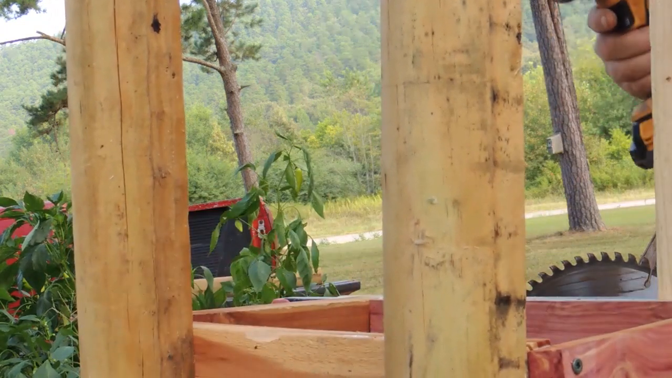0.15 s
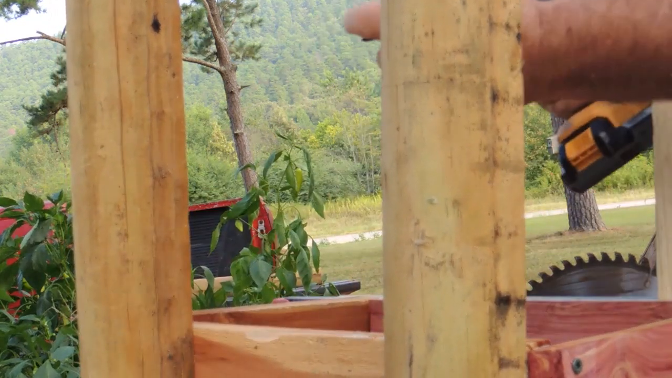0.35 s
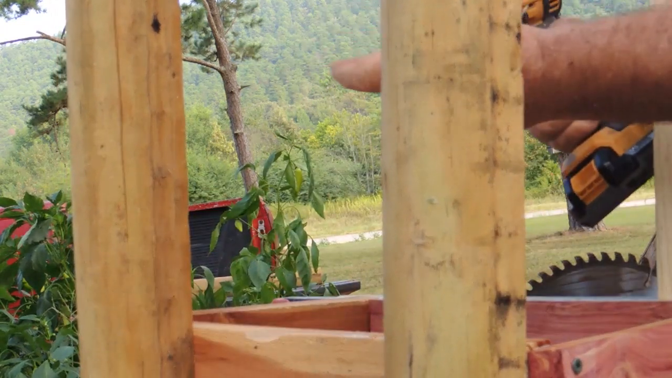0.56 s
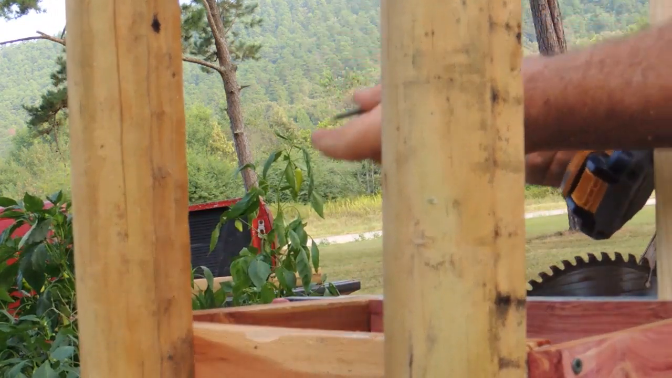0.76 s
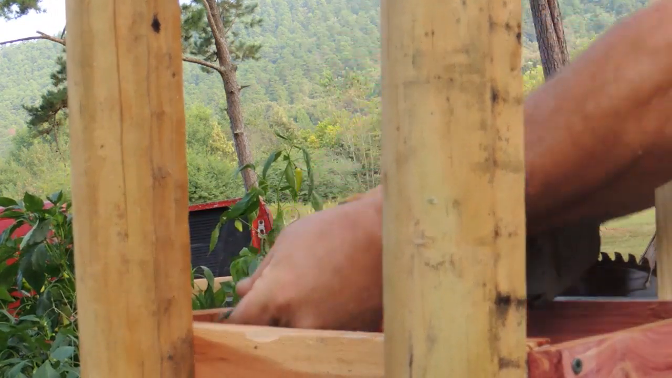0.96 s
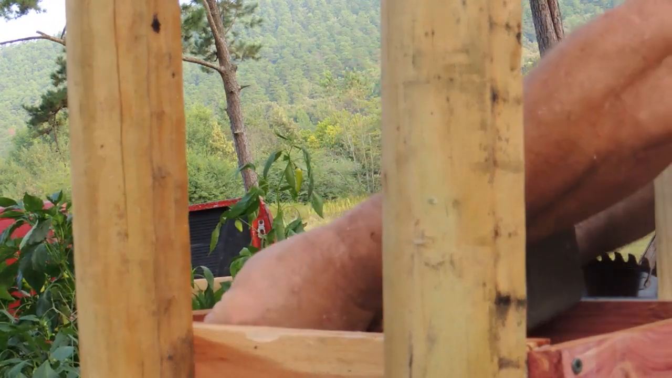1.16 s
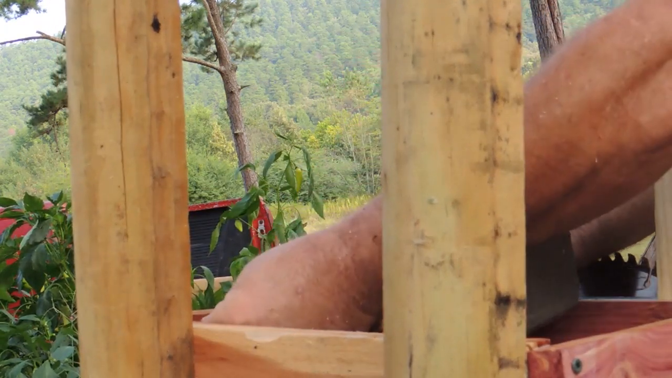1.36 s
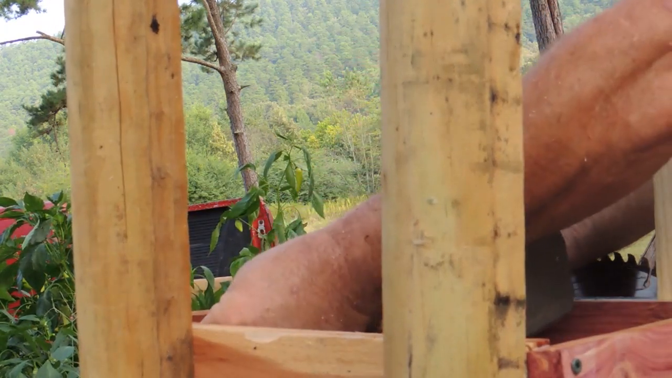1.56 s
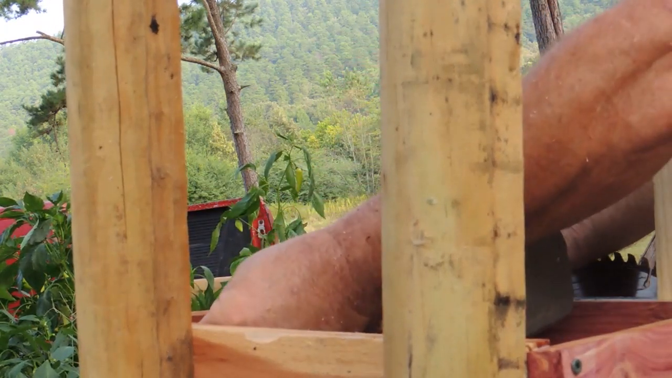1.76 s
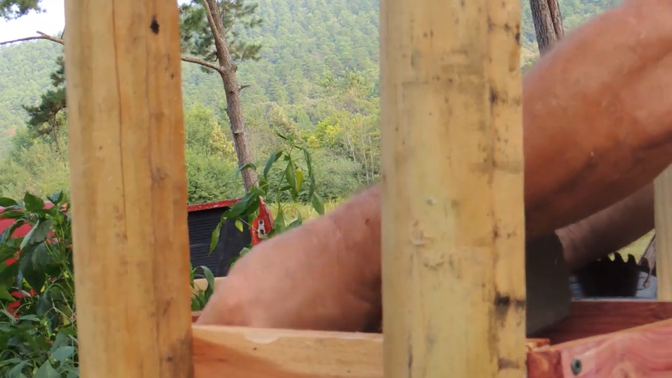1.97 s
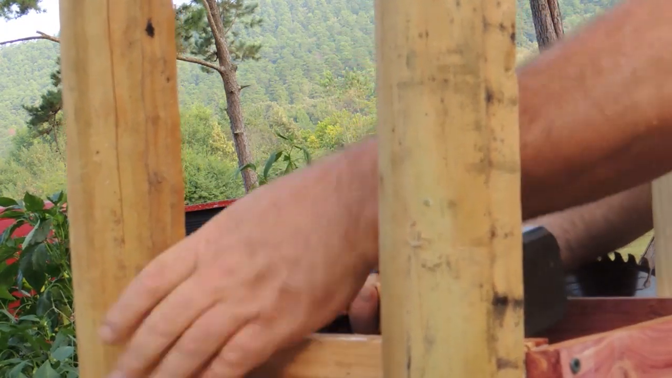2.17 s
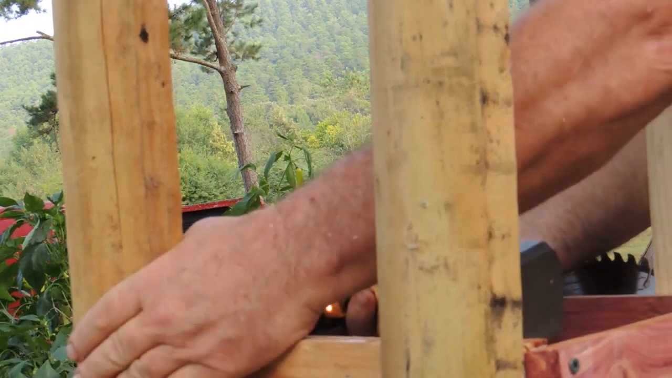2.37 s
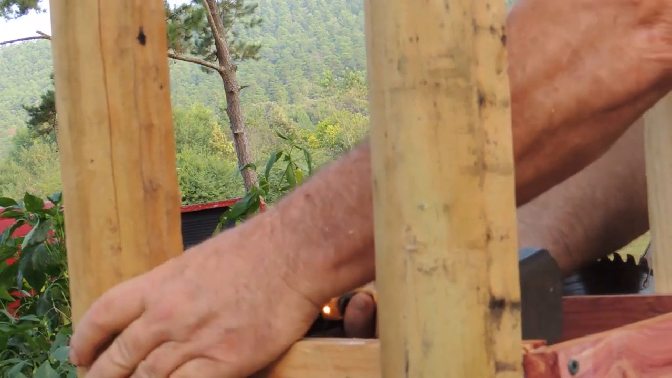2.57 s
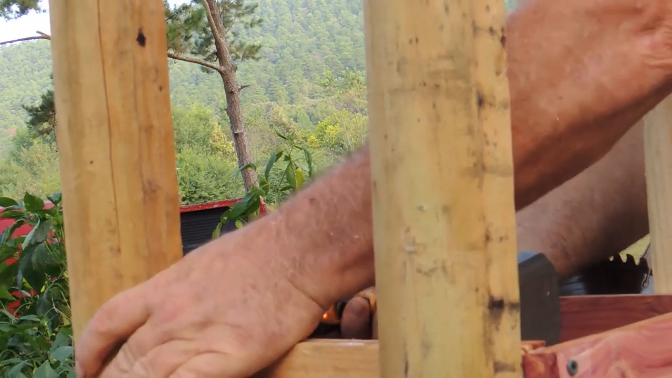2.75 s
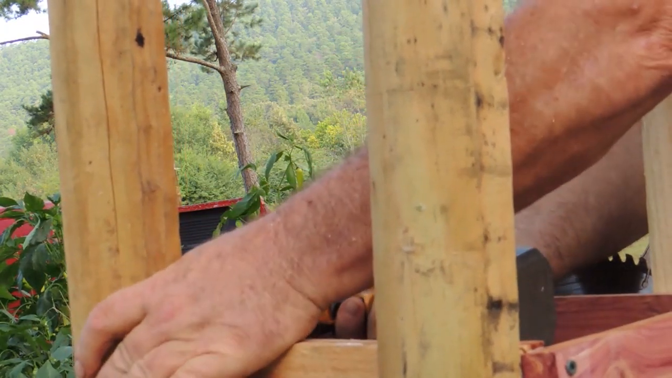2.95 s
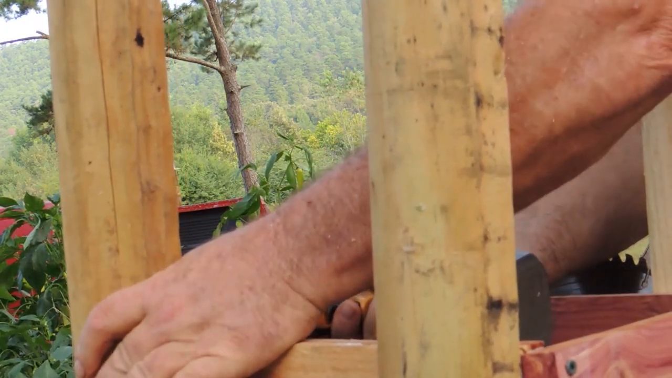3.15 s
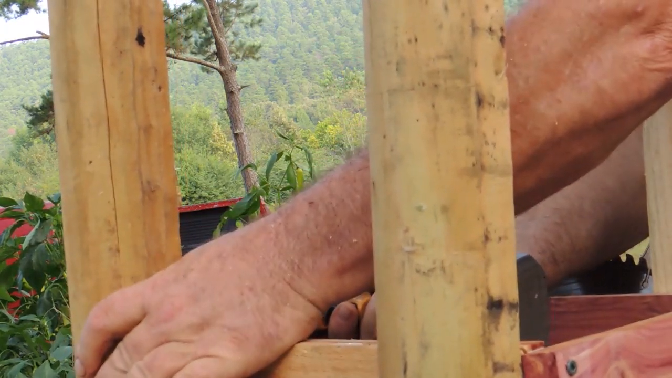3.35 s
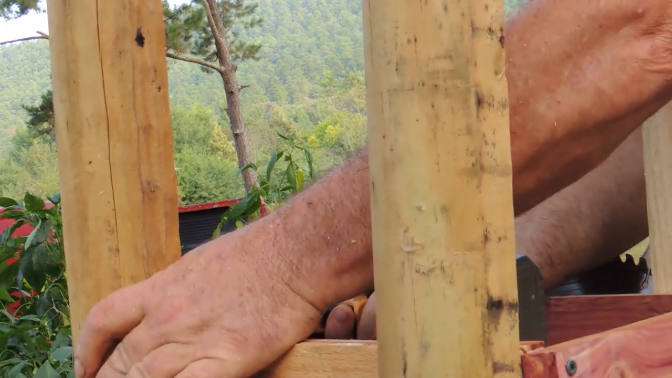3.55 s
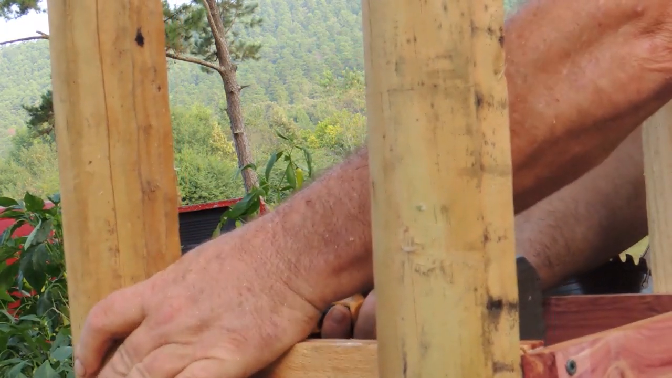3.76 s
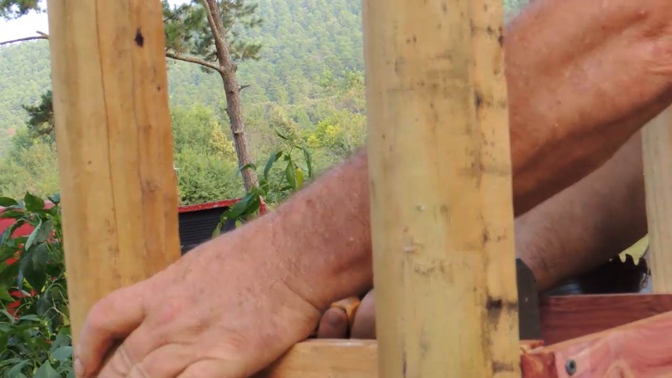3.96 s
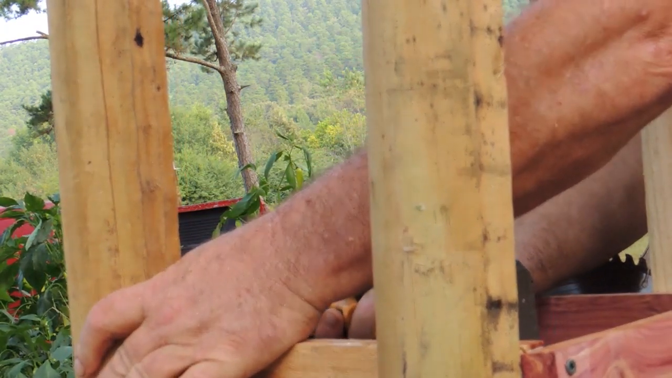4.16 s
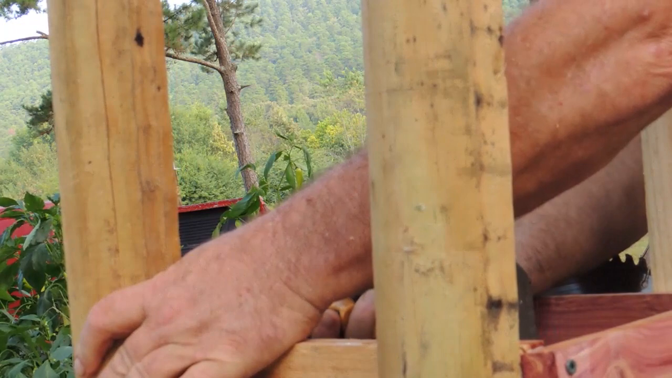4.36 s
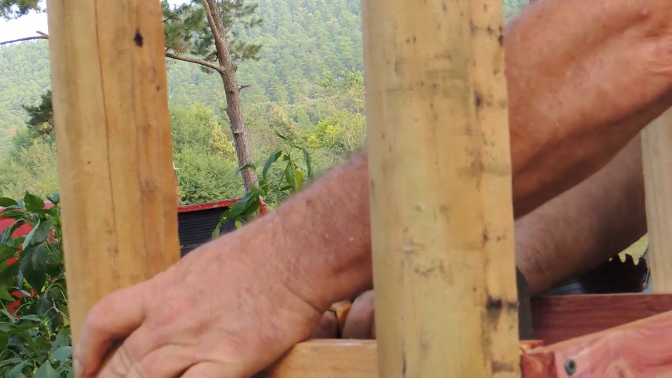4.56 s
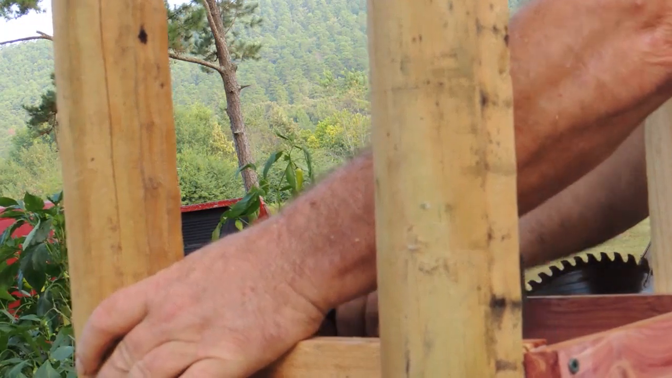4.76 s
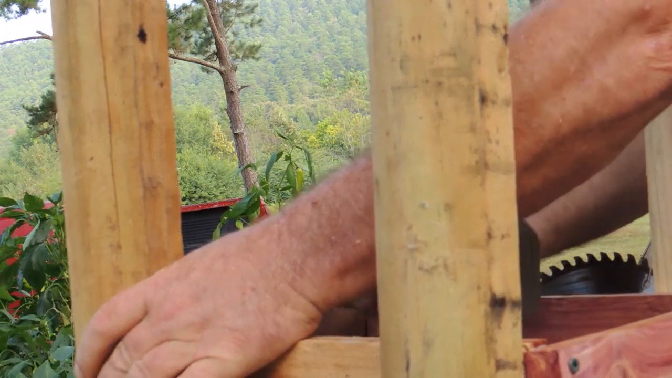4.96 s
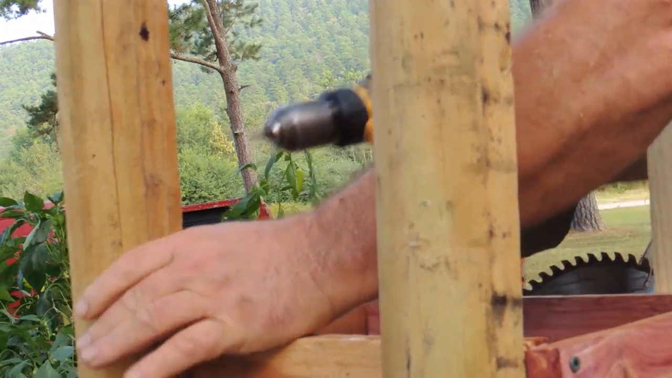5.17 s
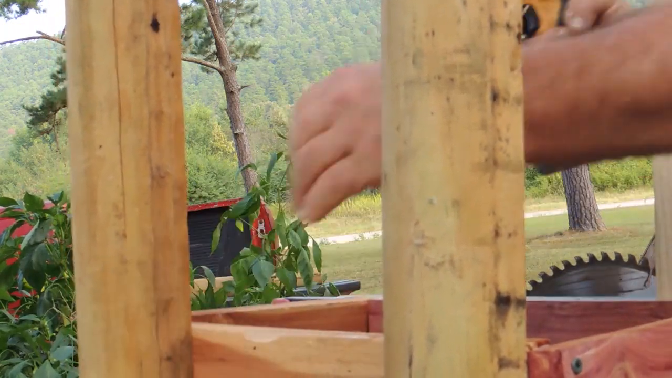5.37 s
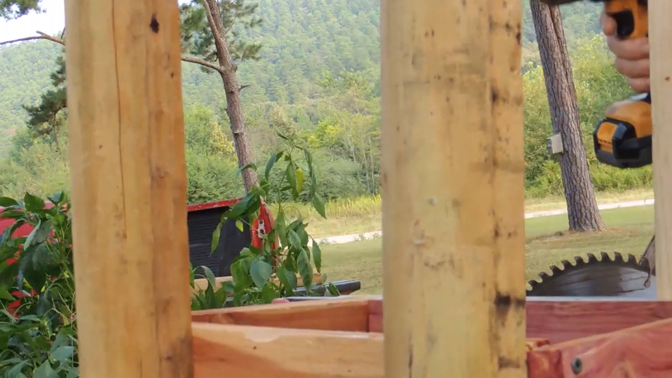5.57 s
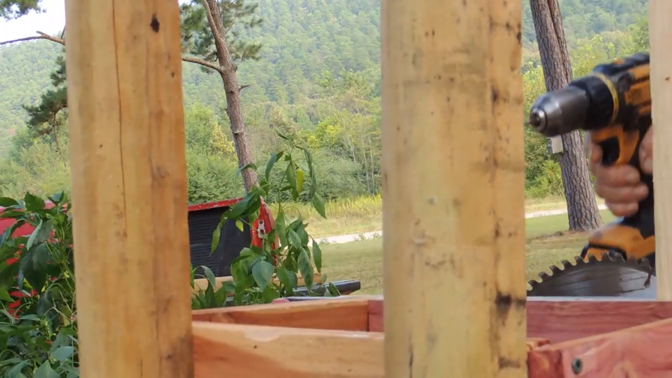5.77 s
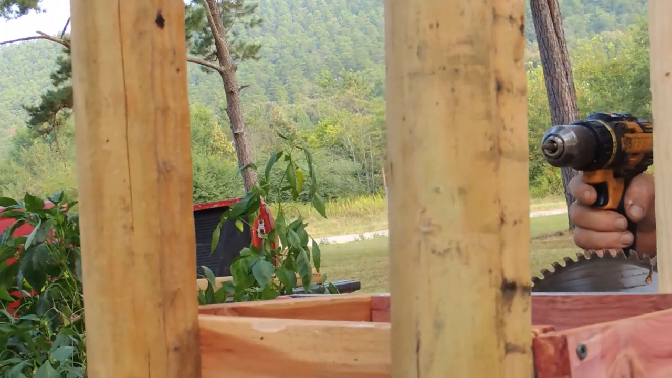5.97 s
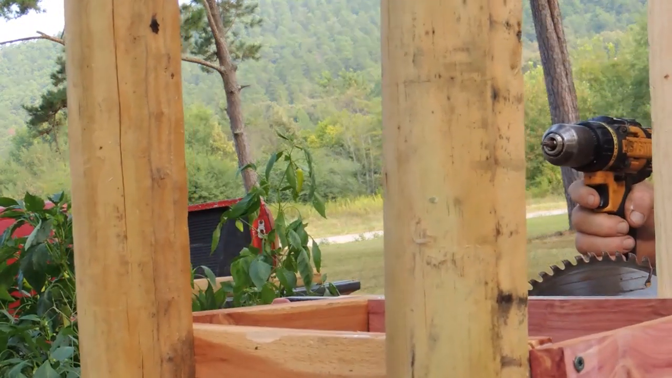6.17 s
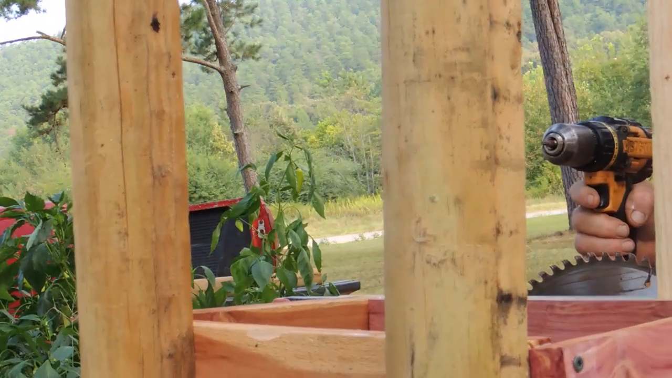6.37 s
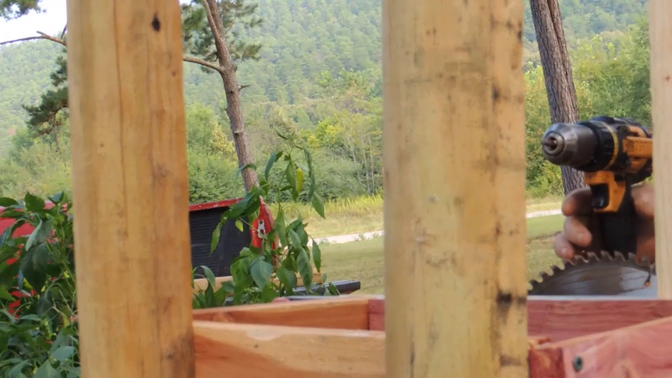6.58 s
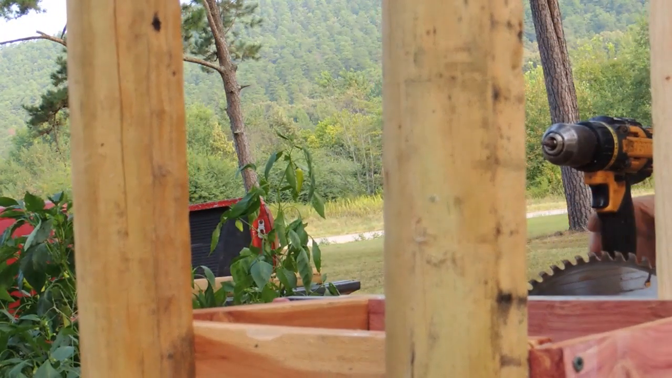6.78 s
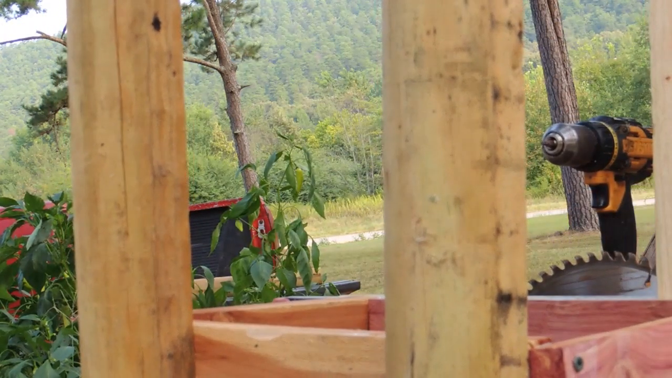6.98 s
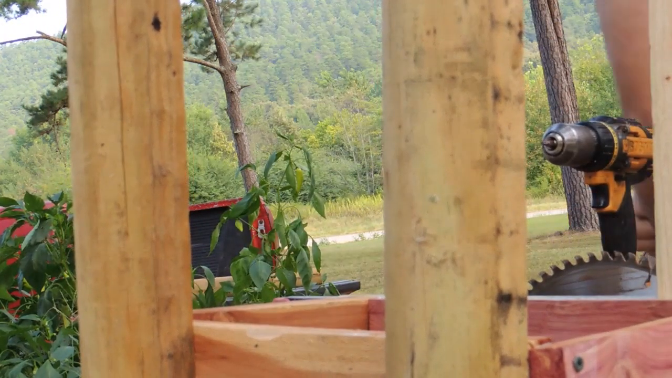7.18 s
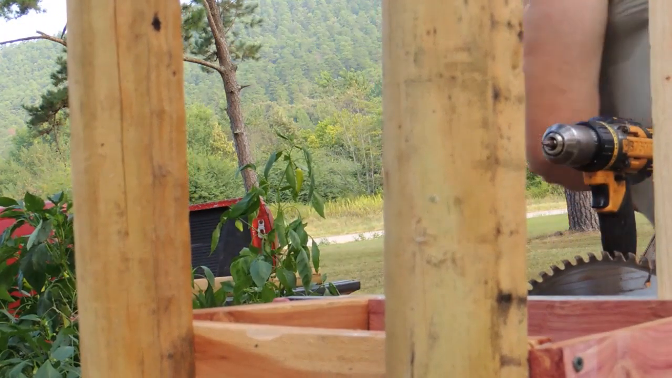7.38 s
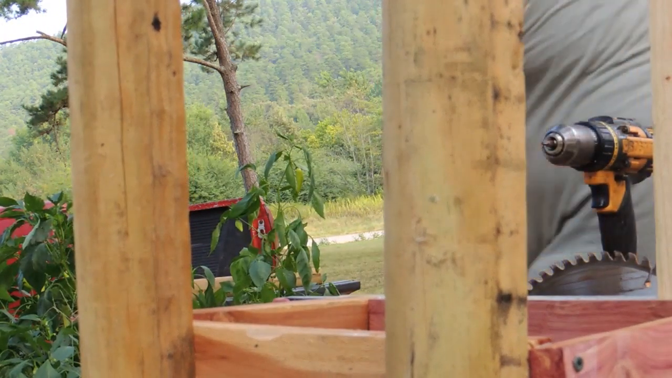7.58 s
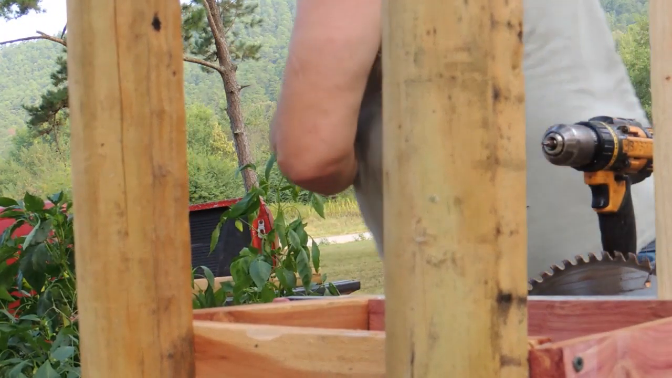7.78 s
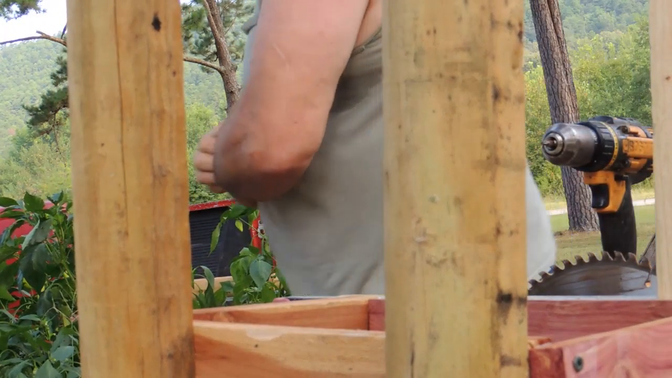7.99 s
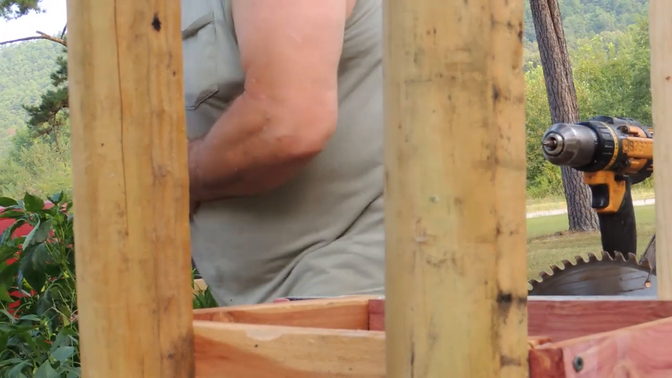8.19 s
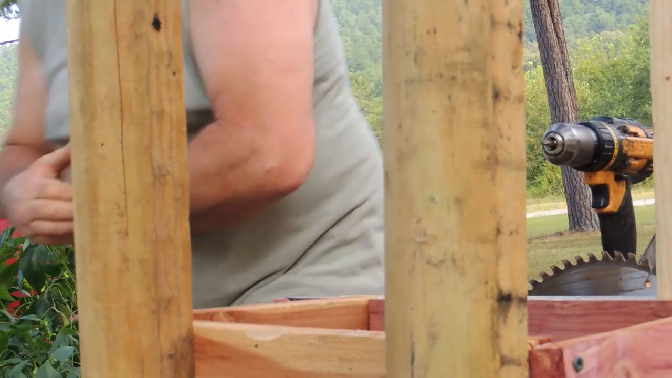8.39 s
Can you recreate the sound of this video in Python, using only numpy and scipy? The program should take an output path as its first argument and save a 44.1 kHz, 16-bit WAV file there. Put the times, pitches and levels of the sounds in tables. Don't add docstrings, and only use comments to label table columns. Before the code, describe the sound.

An open-air porch with constant thin hiss, high shimmering cicadas in the trees and low wind rumble on two widely spaced microphones about a metre from the work. For the first 1.6 seconds only small ticks are heard. At 1.67 a soft contact and a faint electric whistle, then the cordless drill spins up at 1.8, its housing droning briefly. It whines with gear rattle, fan hiss and humming boards; small wood knocks come at 2.8, 2.9 and 3.2-3.3. From 3.8 it strains harder, its pitch sagging until it halts near 4.7. At 4.9 a loud double knock as the tool comes free, smaller bumps at 5.4-5.6, a hard clack and thuds at 5.9-6.1 as it is set down, and another knock at 6.4. Wind gusts bump around 6.4 and 7.7; a near cicada on the right buzzes from 7.5 to 8.2, then faint ticks.

```python
import sys
import numpy as np
from scipy import signal
from scipy.fft import rfft, irfft
from scipy.io import wavfile
from scipy.ndimage import uniform_filter1d, minimum_filter1d

SR = 44100
rng = np.random.default_rng(int(sys.argv[2]) if len(sys.argv) > 2 else 0)


def store_pcm(level_fs):
    pcm = np.round(np.clip(level_fs, -1, 1) * 32767).astype(np.int16)
    wavfile.write(sys.argv[1], SR, np.atleast_2d(pcm).T)


def convert_level_to_amplitude(level_db):
    exponent = np.asarray(level_db, float) / 20
    return 10 ** exponent


N = 371763
TIME = np.arange(N) / SR


def follow(table):
    return np.interp(TIME, *np.transpose(table))


def bump(s, length):
    return np.exp(-((TIME - s) / length) ** 2)


def colour(x, spectrum):
    hz, db = np.transpose(spectrum)
    f = np.arange(x.shape[-1] // 2 + 1) * SR / x.shape[-1] + 1
    gain = convert_level_to_amplitude(np.interp(np.log(f), np.log(hz), db, left=-90, right=-90))
    y = irfft(rfft(x) * gain, x.shape[-1])
    return y / np.sqrt(np.mean(y ** 2))


def walk(rate):
    k = int(SR / rate)
    steps = np.repeat(rng.standard_normal((2, N // k + 1)), k, axis=1)
    return 1.3 * uniform_filter1d(uniform_filter1d(steps, k), k)[:, :N]


def pan(db):
    g = convert_level_to_amplitude(np.array([[db / 2], [-db / 2]]))
    return 2 * g / np.sqrt(np.sum(g ** 2))


def hiss(count=N):
    return rng.standard_normal((2, count))


def grains(scatter_db, count=N):
    size_db = scatter_db * np.minimum(rng.exponential(size=(2, count)), 4)
    return hiss(count) * convert_level_to_amplitude(size_db)


def add(out, s, x):
    i = int(s * SR)
    out[:, i:i + x.shape[1]] += x[:, :N - i]


# [f/Hz, level/dB per Hz]
AIR_SPECTRUM = [(71, -28), (120, 0), (156, -0.5), (183, -4.5), (269, -5), (323, -6), (412, -5.5),
                (1020, -10.5), (3500, -13.5), (4940, -14), (6290, -13.5), (7400, -5), (8870, -10.5),
                (13800, -15.5), (15000, -31)]


def air():
    return convert_level_to_amplitude(-53.5 + .5 * walk(2.0)) * pan(-1.1) * colour(hiss(), AIR_SPECTRUM)


# [f/Hz, width/Hz, level/dB, left minus right/dB]
FAR_CICADAS = [
    (4930, 570, -64.5, -4),
    (7380, 840, -53, -8),
]


def far_cicadas():
    out = 0
    for hz, width, db, pan_db in FAR_CICADAS:
        band = [(hz - 1.32 * width, -30), (hz - width / 2, -4), (hz, 0), (hz + width / 2, -4),
                (hz + 1.3 * width, -30)]
        shimmer_db = 0.29 * walk(1.0) + 0.87 * walk(30)
        out = out + convert_level_to_amplitude(db + shimmer_db) * pan(pan_db) * colour(grains(1.7), band)
    return out


# [f/Hz, level/dB per Hz]
CICADA_SONG = [(5000, -37), (8500, -9), (9270, 1), (10100, -3), (11200, -5), (11600, -11), (13000, -12),
               (14400, -12)]


def near_cicada():
    on_s, attack_s, off_s, release_s = 7.47, .25, 8.17, .06
    pulse_hz = 115
    pulses = 1 + 0.18 * np.cos(2 * np.pi * pulse_hz * TIME + walk(12)[0])
    sings = np.clip(np.minimum((TIME - on_s) / attack_s, 1 + (off_s - TIME) / release_s), 0, 1)
    return convert_level_to_amplitude(-53.5 + 1.5 * walk(10)[0]) * sings * pan(-11) * pulses * colour(grains(1.5), CICADA_SONG)


# [f/Hz, level/dB per Hz]
WIND_SPECTRUM = [(12, 0), (35, -2), (60, -4), (110, -12), (200, -26.5), (400, -30)]
# [t/s, peak level/dB, length/s]
WIND_GUSTS = [(.19, -55, 0.078), (.45, -52.5, 0.1), (1.08, -52, 0.06), (1.7, -53, 0.078), (2.52, -55, 0.13),
              (2.9, -56, 0.089), (3.3, -57, 0.044), (3.48, -49, 0.23), (4.5, -52.5, 0.13),
              (5.63, -51.5, 0.11), (6.13, -54, 0.033), (6.29, -50, 0.033), (6.42, -46, 0.078),
              (6.97, -70, 0.13), (7.18, -53, 0.46), (7.66, -43.5, 0.062), (7.76, -51, 0.087),
              (7.89, -49, 0.019), (8.02, -52.5, 0.24), (8.36, -56, 0.037)]


def wind():
    breeze = convert_level_to_amplitude(-60)
    blows = breeze + sum((convert_level_to_amplitude(db) - breeze) * bump(s, length) for s, db, length in WIND_GUSTS)
    return blows * convert_level_to_amplitude(walk(15)) * pan(-5.5) * colour(hiss(), WIND_SPECTRUM)


# [t/s, peak level/dB, f/Hz, length/s]
SMALL_TICKS = [(0.039, -45.5, 5000, 0.0065), (0.543, -49, 10000, .01), (0.882, -59, 1120, 0.03),
               (1.6013, -49, 4760, 0.015), (5.218, -51, 4700, 0.014), (5.28, -51, 4770, 0.011),
               (5.472, -51, 2850, 0.011), (5.81, -59, 1730, 0.023), (6.079, -44.5, 3910, 0.0065),
               (6.113, -56, 1140, 0.012), (6.906, -53, 4640, 0.013), (6.974, -50.5, 3220, 0.013),
               (7.086, -54, 2700, 0.011), (7.65, -59, 3520, 0.02), (8.008, -57, 4860, 0.015),
               (8.306, -54.5, 3380, 0.015), (8.417, -52, 1630, 0.02), (8.404, -58, 2580, .03),
               (8.248, -55, 4800, .015), (8.415, -57, 3300, .02)]


def ticks():
    out, t = np.zeros((2, N)), TIME[:SR // 10]
    for s, db, hz, length in SMALL_TICKS:
        puff = colour(hiss(len(t)), [(hz / 1.6, -25), (hz, 0), (hz * 1.25, -25)])
        envelope = np.exp(-t / max(length, .002)) * (1 - np.exp(-t / 0.0021))
        add(out, s, convert_level_to_amplitude(db + 0.5) * pan(-6.5) * puff * envelope)
    return out


# [t/s, peak level/dB, length/s]
SLEEVE_BRUSHES = [(1.675, -49, 0.0053), (5.39, -54, .012), (6.66, -53, 0.026), (5.83, -56, 0.045),
                  (6.083, -54, .015), (6.137, -51.5, 0.018), (7.662, -54, 0.013)]
# [f/Hz, level/dB per Hz]
CLOTH_SPECTRUM = [(800, -5), (2000, -2), (5000, -5), (10000, -5.5), (14000, -6)]


def brushes():
    strokes = sum(convert_level_to_amplitude(db) * bump(s, length) for s, db, length in SLEEVE_BRUSHES)
    return strokes * pan(-4.5) * colour(grains(2.5), CLOTH_SPECTRUM)


# [t/s, peak level/dB, f/Hz, t60/s]
RINGING_TAPS = [(2.778, -22, 290, .04), (2.778, -30, 1150, .03), (2.79, -30, 350, .04),
                (2.907, -26, 350, .04), (2.907, -31, 1150, .03), (3.199, -30, 330, .04),
                (3.282, -25, 280, .04), (4.9043, -12, 322, .04), (4.9042, -20, 660, .03),
                (4.904, -21, 1250, .02), (4.9045, -27, 2150, .025), (4.911, -30, 985, .04),
                (4.9055, -22, 470, .04), (4.908, -37, 1590, .06), (4.923, -32, 668, .05),
                (4.961, -44, 760, .05), (5.94, -32, 950, .04), (5.941, -47, 1220, .12),
                (6.01, -49, 1220, .15), (6.0008, -26, 470, .03), (6.4345, -23, 400, .018),
                (6.441, -36, 920, .05), (7.6805, -32, 760, .028), (7.682, -40, 1870, .04)]


def taps():
    out, t = np.zeros((2, N)), TIME[:SR // 10]
    for s, db, hz, t60 in RINGING_TAPS:
        ring = np.sin(2 * np.pi * hz * t + [[np.pi - .5], [np.pi + .5]])
        onset = 1 - np.exp(-(t / .0012) ** 2)
        add(out, s, convert_level_to_amplitude(db - 60 * t / t60) * pan(-3.5) * ring * onset)
    return out


# [t/s, peak level/dB, ring f/Hz, crack above it/dB, upper ring f/Hz]
WOOD_KNOCKS = [(1.673, -34.5, 760, -11, 1490), (2.779, -28, 308, -9, 1145), (2.791, -28, 328, -17, 3600),
               (2.908, -23.5, 340, -11, 1150), (3.197, -35, 404, -10, 1610), (3.286, -28, 394, -18, 2380),
               (4.911, -20, 257, -7.5, 1000), (4.925, -20.5, 335, -34, 1070),
               (4.936, -28.5, 320, -28, 1030), (4.945, -34, 328, -25, 900),
               (5.3829, -29.5, 278, -14.5, 1360), (5.402, -39, 327, -10, 990), (5.573, -39, 242, -26, 1230),
               (5.956, -34.5, 232, -3, 1210), (5.997, -32.5, 597, -3, 1370), (6, -23.5, 450, -20, 1260),
               (6.019, -35, 392, -7, 1230), (6.06, -40.5, 250, -10, 1040), (6.14, -41.5, 450, -15, 1100),
               (6.439, -29, 274, -1, 3095), (6.442, -33.5, 262, -1, 1960), (6.447, -33.5, 253, 0, 1590),
               (6.453, -39, 248, -2, 3080), (6.631, -42, 1110, -16, 2600), (6.636, -38, 774, 0, 2440),
               (6.739, -45.5, 242, -10, 3660), (7.578, -45, 685, -8, 988)]
CHUCK_STRIKES = [
    (4.9036, -19, 330, -2, 3610),
    (5.9387, -21.5, 444, -10, 3460),
]
# [t/s, peak level/dB, ring f/Hz]
SOFT_THUMPS = [(1.676, -44, 323), (5.715, -46.5, 229), (5.8, -44.5, 225), (6.33, -44, 422),
               (6.595, -46.5, 230), (6.636, -40, 383), (8.05, -49, 900)]
# [f as a multiple of the ring, level/dB per Hz]
FRAME_MODES = [(.3, -38), (.6, -1.5), (1.0, 1), (1.5, -3), (2.2, -6), (3.6, -13.5), (6.5, -32), (10.5, -38)]
# [f/Hz, level/dB per Hz]
CRACK_SPECTRUM = [(1000, 4), (1800, 3), (3000, 1.5), (3800, -2.5), (5000, -12.5), (8000, -10), (14000, -27)]
# [f/Hz, level/dB, t60/s]
POST_MODES = [(670, 0, 0.037), (800, -8, 0.033), (948, -9, 0.032), (1210, -8, 0.027)]


def knocks():
    out, t = np.zeros((2, N)), TIME[:SR // 4]
    later = np.array([[np.pi - .5], [np.pi + .5]])
    push = 1 - np.exp(-(t / 0.002) ** 2)
    snap = 1 - np.exp(-t / 0.00093)
    blows = [(0, k) for k in WOOD_KNOCKS] + [(1, k) for k in CHUCK_STRIKES]
    blows += [(0, (s, db, hz, -18, 4 * hz)) for s, db, hz in SOFT_THUMPS]
    for steel, (s, db, hz, crack_db, upper_hz) in blows:
        t60 = 0.061 * (330 / hz) ** 0.56
        posts = sum(convert_level_to_amplitude(g - 60 * t / d) * np.sin(2 * np.pi * f * t + later) for f, g, d in POST_MODES)
        ring = convert_level_to_amplitude(-1 - 65 * t / t60) * np.sin(2 * np.pi * hz * t + later)
        modes = colour(hiss(len(t)), np.multiply(FRAME_MODES, (hz, 1)))
        frame = (convert_level_to_amplitude(-8.5 - 55 * t / t60) + convert_level_to_amplitude(-28 - 60 * t / .16)) * modes
        upper = convert_level_to_amplitude(-6 * steel - 60 * t / .03) * np.sin(2 * np.pi * upper_hz * t + later)
        sharp = min((upper_hz / 2200) ** 0.21, 1.15)
        crack = colour(grains(3.0, len(t)), np.multiply(CRACK_SPECTRUM, (sharp, 1)))
        crack = (convert_level_to_amplitude(-1 - 60 * t / 0.03) + convert_level_to_amplitude(-30 - 60 * t / 0.25)) * crack
        softness_db = 0.16 * min(db + 19.5, 0)
        low = (ring + frame + steel * posts) * push
        high = (upper + convert_level_to_amplitude(softness_db) * crack) * snap
        add(out, s - .001, convert_level_to_amplitude(db) * pan(-5.5) * (low + convert_level_to_amplitude(crack_db) * high))
    return out


# [t/s, peak level/dB, f/Hz, length/s]
RESONANT_GROANS = [(1.861, -46.5, 2120, 0.045), (1.921, -47, 1280, 0.085), (2.047, -46, 690, 0.025),
                   (2.127, -41.5, 2250, 0.062), (2.195, -40.5, 721, 0.025), (2.97, -44, 836, .03),
                   (3.66, -45, 1170, 0.022), (3.75, -47, 437, .03), (3.87, -48, 556, 0.018),
                   (3.98, -46.5, 446, 0.19), (4.171, -46, 736, .025), (4.4, -43, 620, 0.076),
                   (4.4, -49, 755, 0.061), (4.591, -41, 2040, 0.058), (4.62, -47, 800, 0.084)]


def groans():
    out, t = np.zeros((2, N)), TIME[:SR // 2 + SR // 4]
    middle = t[-1] / 2
    spread = 2 * 0.062
    for s, db, hz, length in RESONANT_GROANS:
        band = [(hz * (1 - spread), -25), (hz, 0), (hz * (1 + spread), -25)]
        swell = np.exp(-((t - middle) / length) ** 2)
        add(out, s - middle, convert_level_to_amplitude(db) * pan(-3.0) * swell * colour(grains(1.4, len(t)), band))
    return out


def porch(x):
    t = TIME[:SR // 25]
    sparse = rng.random((2, len(t))) < .03
    echoes = hiss(len(t)) * sparse * convert_level_to_amplitude(-60 * t / .07)
    echoes = echoes / np.sqrt(np.sum(echoes ** 2, axis=1, keepdims=True))
    shared = np.roll(x[:1], N // 3)
    return signal.fftconvolve(shared, echoes, axes=1)[:, :N] + 1.5 * x


def patchy(x):
    patch_hz, patch_s, depth_db = 350, .07, .8
    z = signal.stft(x, nperseg=512)[2]
    field = rng.standard_normal(z.shape[1:])
    for _ in range(2):
        field = uniform_filter1d(field, int(patch_hz * 512 / SR), axis=0)
        field = uniform_filter1d(field, int(patch_s * SR / 256), axis=1)
    return signal.istft(z * convert_level_to_amplitude(depth_db * field / field.std()), nperseg=512)[1][:, :N]


# [f/Hz, level/dB per Hz]
BOARD_SPECTRUM = [(59, -47), (100, -11), (124, -13.5), (215, 0), (257, -3), (297, -0.5), (341, -1),
                  (441, -0.5), (485, -7), (560, 4.5), (730, -43), (1230, -120)]


def board_hum(rattle_db):
    depth = np.interp(TIME, (2.2, 2.9), (0, 1))
    level_db = rattle_db - 26 + 9.5 * depth + 5.5 * bump(3.99, 0.14)
    level_db = level_db + 3.1 * walk(14) + 1.2 * walk(5.76)[0]
    return convert_level_to_amplitude(level_db) * colour(porch(grains(3.7)), BOARD_SPECTRUM)


# [f/Hz, level/dB per Hz]
HOUSING_SPECTRUM = [(290, -48), (500, -5.5), (558, -14), (617, -0.5), (694, -4.5), (752, 1.5), (862, -8.5),
                    (950, -27), (1240, -35), (2090, -120)]


def housing_drone(effort_db, load):
    level_db = effort_db - 12.5 + 2.5 * load + 10.5 * bump(1.83, 0.043) - 3.5 * bump(3.16, 0.5)
    level_db = level_db + 1.1 * walk(23) + 0.76 * walk(6.87)[0]
    return convert_level_to_amplitude(level_db) * colour(grains(1.8), HOUSING_SPECTRUM)


# [f/Hz, level/dB per Hz]
FAN_SPECTRUM = [(2470, -43), (4200, -0.5), (4430, -1), (4930, 1), (5200, -3.5), (7960, 1), (8810, -1.5),
                (10300, 1), (13600, -2), (14600, -5), (15000, -64)]


def fan_hiss(effort_db, lost_hz, throb):
    level_db = effort_db + 0.2 - 0.03 * lost_hz - 0.86
    level_db = level_db + 0.11 * walk(9) + .5 * walk(30) + 0.2 * walk(7.89)[0]
    return convert_level_to_amplitude(level_db) * colour(throb * porch(grains(2.3)), FAN_SPECTRUM)


# [f/Hz, level/dB per Hz]
GEARBOX_SPECTRUM = [(500, -42), (850, -8.5), (1300, -5.5), (1430, -10), (1590, -6.5), (1790, -8.5),
                    (2400, -5.5), (3230, -5), (3610, -6), (3900, -5.5), (4420, -9.5), (4780, -32),
                    (5500, -10.5), (7150, -22), (12100, -120)]
# [f/Hz, level/dB per Hz]
STRAIN_SPECTRUM = [(1500, -19), (2100, -2.5), (2600, -5.5), (3300, -4.5), (4200, -0.5), (4700, -28)]


def gear_rattle(rattle_db, load, throb):
    light = colour(throb * porch(grains(4.54)), GEARBOX_SPECTRUM)
    strained = convert_level_to_amplitude(-1.5) * load ** 3 * colour(throb * grains(4.1), STRAIN_SPECTRUM)
    return convert_level_to_amplitude(rattle_db - 3.5 + 0.58 * walk(18)) * (light + strained)


# (on t/s, off t/s, f/Hz, level/dB)
TRIGGER_CHOPPER = (1.668, 1.81, 3887, -51.5)


def trigger_whistle():
    on, off, hz, db = TRIGGER_CHOPPER
    gate = np.clip(np.minimum(TIME - on, off - TIME) / 0.005, 0, 1)
    return convert_level_to_amplitude(db) * np.sin(2 * np.pi * hz * TIME + [[0], [1.6]]) * gate


STRONG_ORDERS = (.71, 1, 5.04, 11.27, 12, 12.43, 15.02, 20, 25.02)
# [t/s, level/dB]
STRONG_LEVELS = [
    [(2.5, -75), (3.2, -59), (3.7, -54.5), (4.2, -56), (4.3, -68), (4.5, -56), (4.6, -49.5), (4.7, -42)],
    [(2.5, -65), (2.68, -49), (3.05, -51.5), (3.4, -52.5), (3.55, -66), (3.9, -57), (4.1, -49), (4.25, -50),
     (4.6, -50.5)],
    [(2.0, -54), (2.4, -53), (2.62, -48), (2.75, -47), (2.88, -44), (2.95, -51), (3.05, -43), (3.17, -44),
     (3.3, -52), (3.44, -44), (3.7, -45), (3.88, -54), (4.15, -52), (4.42, -46), (4.52, -49)],
    [(3.8, -60), (4.1, -44), (4.3, -42), (4.42, -37), (4.48, -42), (4.55, -35), (4.6, -47), (4.635, -39),
     (4.672, -28), (4.69, -42)],
    [(1.85, -41), (2.1, -42), (2.2, -38), (2.5, -40), (2.68, -36), (2.8, -39), (3.05, -39.5), (3.3, -38),
     (3.55, -36), (3.66, -33.5), (3.76, -33.5), (3.88, -38), (3.93, -46), (4.05, -44), (4.3, -41),
     (4.5, -49)],
    [(2.1, -58), (2.4, -52), (3.3, -50), (3.6, -42), (3.75, -37), (3.82, -40), (3.89, -33), (3.91, -47),
     (4.2, -43), (4.42, -42), (4.6, -50)],
    [(2.0, -54), (2.2, -39.5), (2.4, -45), (3.1, -48), (3.4, -50), (4.7, -48)],
    [(1.9, -51), (2.18, -35.5), (2.3, -45), (2.8, -54), (3.3, -44.5), (3.8, -50), (4.05, -52), (4.3, -53),
     (4.6, -53)],
    [(1.9, -48), (2.1, -42), (2.35, -43), (2.5, -45), (2.9, -50), (3.1, -43), (3.6, -39), (3.78, -40),
     (3.9, -46), (4.4, -43), (4.6, -45)],
]
WEAK_ORDERS = (2.25, 7.38, 16, 18, 21, 23, 26, 28, 29, 30, 31, 33, 35, 36.78, 39, 40.03, 41, 43)
# [running light/dB, under load/dB]
WEAK_LEVELS = [(-52, -61), (-62, -53), (-55, -57), (-55, -62), (-48, -55), (-53, -57), (-49, -52),
               (-54, -60), (-53, -60), (-55, -60), (-52, -62), (-55, -65), (-53, -65), (-54, -61),
               (-58, -65), (-59, -60), (-54, -60), (-59, -65)]


def whine(turns, load):
    settle_db = np.interp(TIME, (1.85, 2.0), (-12, 0))
    strong = [follow(rows) for rows in STRONG_LEVELS]
    weak = [settle_db + light + load * (heavy - light) for light, heavy in WEAK_LEVELS]
    out = 0
    for order, db in zip([*STRONG_ORDERS, *WEAK_ORDERS], strong + weak):
        wobble = (.3 + .3 * load ** 2) * walk(30)[0] + .3 * walk(160)[0]
        wobble = wobble + .1 * walk(4) + [[0], [np.pi / 2]]
        flutter_db = (.7 + 1.0 * load ** 3) * walk(22)[0] + .4 * walk(6) + 1.3 * walk(45)
        out = out + convert_level_to_amplitude(db + flutter_db) * np.sin(2 * np.pi * order * turns + wobble)
    return out


# [t/s, speed lost f/Hz]
SCREW_DRAG = [(2.06, 1.5), (2.3, 4.5), (2.78, 11.5), (3.09, 12), (3.3, 9), (3.48, 8), (3.6, 11),
              (3.65, 13.5), (3.76, 14), (3.8, 15.3), (4.06, 20.5), (4.3, 27.5), (4.42, 31.5), (4.5, 43),
              (4.59, 57), (4.665, 71), (4.69, 92), (4.72, 110)]
# [t/s, gearbox level/dB]
TOOL_EFFORT = [(1.64, -58), (1.68, -53.5), (1.79, -47), (1.85, -38.5), (1.92, -34), (3.8, -33.5),
               (4.695, -31.5), (4.722, -46), (4.76, -61)]
# [t/s, level added/dB]
BIT_JOLTS = [(2.07, 1.6), (2.38, 1.4), (2.73, 1.3), (3.89, 2.6), (4.0, 0.82), (4.56, 2.5), (4.67, 2.8)]


def drill():
    free_hz, full_trigger_s, spin_up_s = 333, 1.79, .032
    lagging = np.exp(-np.maximum(TIME - full_trigger_s, 0) / spin_up_s)
    lost_hz = follow(SCREW_DRAG)
    turns = np.cumsum(free_hz * (1 - lagging) - lost_hz) / SR
    load = np.interp(TIME, (2.4, 4.2), (0, 1))
    running = np.interp(TIME, (1.815, 1.86, 4.685, 4.705), (0, 1, 1, 0))
    effort_db = np.interp(TIME, *np.transpose(TOOL_EFFORT), left=-120, right=-120)
    rattle_db = effort_db + sum(db * bump(s, 0.014) for s, db in BIT_JOLTS)
    throb = 1 + .22 * np.cos(2 * np.pi * turns + walk(9))
    noises = gear_rattle(rattle_db, load, throb) + housing_drone(effort_db, load)
    noises = noises + board_hum(rattle_db) + fan_hiss(effort_db, lost_hz, throb)
    tones = convert_level_to_amplitude(1.6) * running * whine(turns, load)
    return pan(-4.3) * (patchy(noises) + tones + trigger_whistle())


def scene():
    outdoors = air() + far_cicadas() + near_cicada() + wind()
    handling = ticks() + brushes() + taps() + knocks()
    return outdoors + handling + groans() + drill()


# [f/Hz, spreads of chance that open a hole]
HOLE_RARITY = [(1500, 3.5), (3000, 2.2), (3500, 1.5), (4200, 1.0), (4800, 1.4), (5200, .9), (6100, .9),
               (6600, 2.6), (8500, 2.6), (10000, 2.2), (14000, 1.9)]


def dropouts(x):
    flutter_db, hole_db, hole_s = 2.0, -30, .06
    hz, _, z = signal.stft(x, fs=SR, nperseg=1024)
    frames = int(hole_s * SR / 512)
    field = uniform_filter1d(rng.standard_normal(z.shape[1:]), 3, axis=0)
    field = uniform_filter1d(field, frames, axis=1)
    field = field / field.std()
    power = uniform_filter1d(np.sum(np.abs(z) ** 2, axis=0), 3, axis=0)
    power = uniform_filter1d(power, 2 * frames, axis=1)
    toneless = np.clip(3 - 2 * power / uniform_filter1d(power, 21, axis=0), 0, 1)
    body = np.sum(np.abs(z[:, (hz > 1000) & (hz < 4000)]) ** 2, axis=(0, 1))
    quiet = minimum_filter1d(uniform_filter1d(body, 3), 7)
    no_blow = minimum_filter1d(np.clip(2.5 - body / quiet, 0, 1), 3)
    plain = toneless * (hz > 1000)[:, None] * no_blow
    rarity = np.interp(hz, *np.transpose(HOLE_RARITY))[:, None]
    db = plain * (hole_db * np.clip(3 * (field - rarity), 0, 1) - flutter_db * field)
    return signal.istft(z * convert_level_to_amplitude(db), nperseg=1024)[1][:, :N]


def roll_off(x):
    return signal.sosfilt(signal.butter(12, 14240, fs=SR, output="sos"), x)


def record(dry):
    passed = np.arange(N // 2 + 1) * SR / N < 14240
    mix = irfft(rfft(dropouts(dry)) * passed, N)
    return roll_off(mix)


dry = scene()
out = record(dry)
store_pcm(out)
```